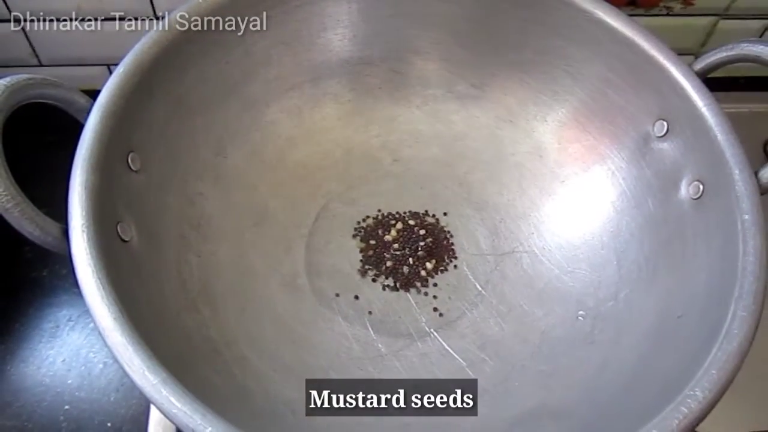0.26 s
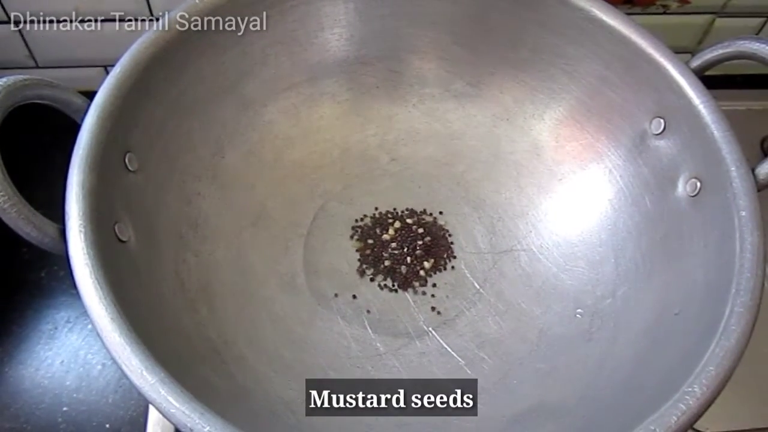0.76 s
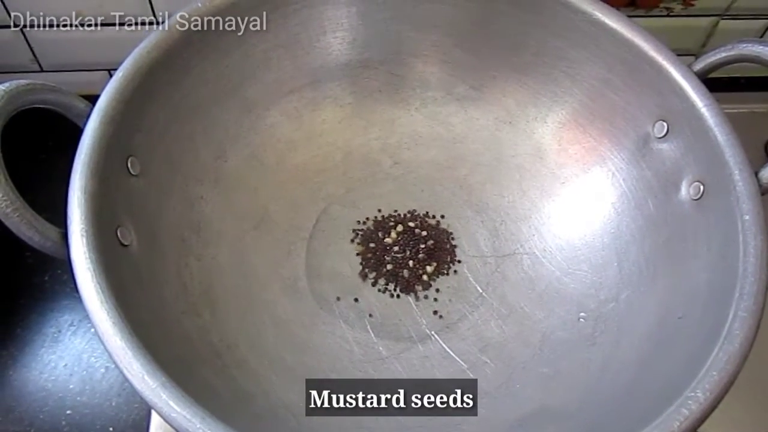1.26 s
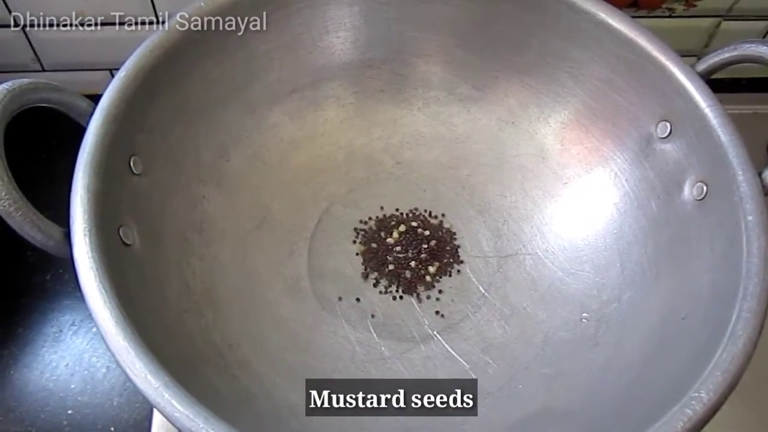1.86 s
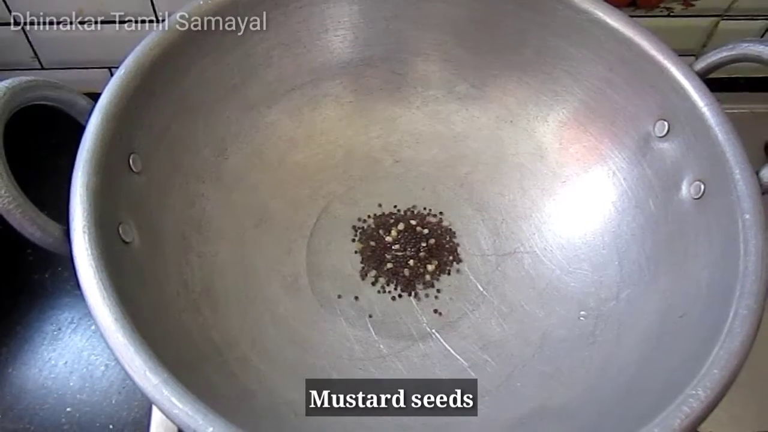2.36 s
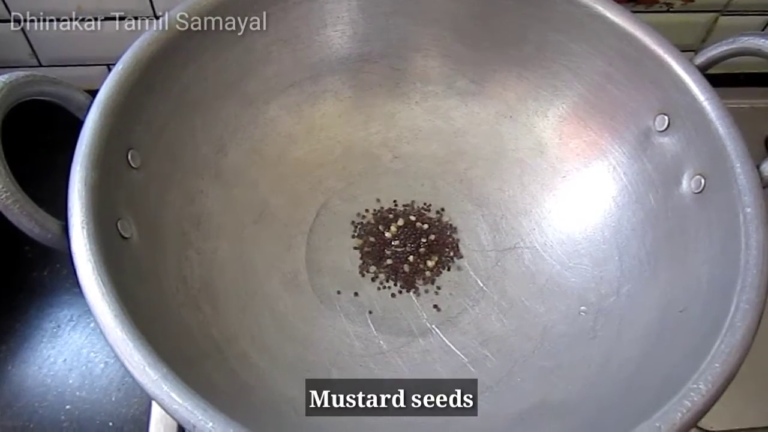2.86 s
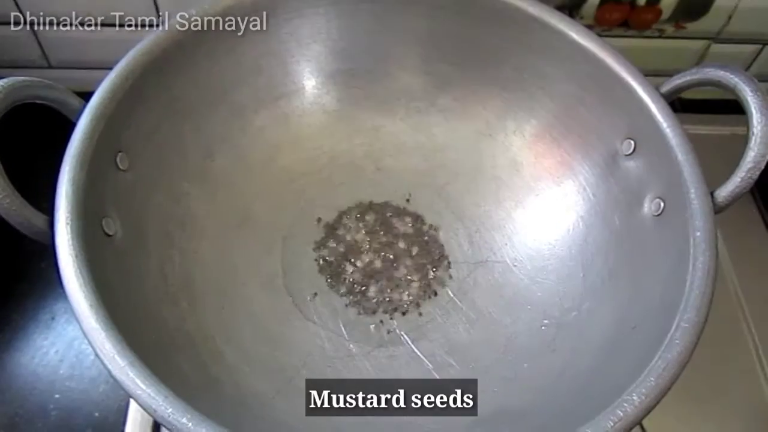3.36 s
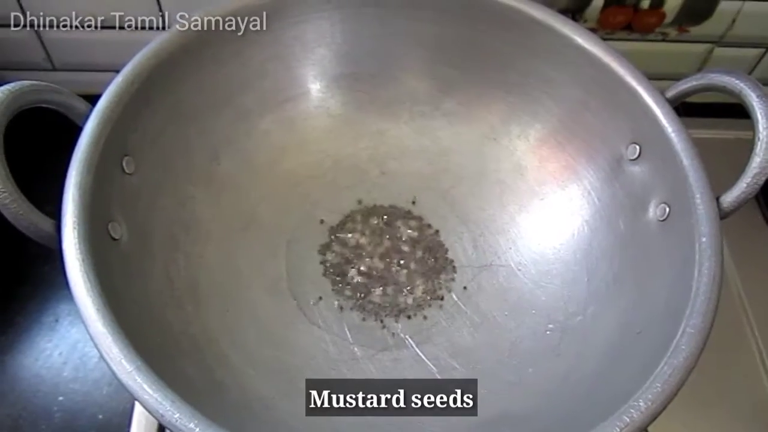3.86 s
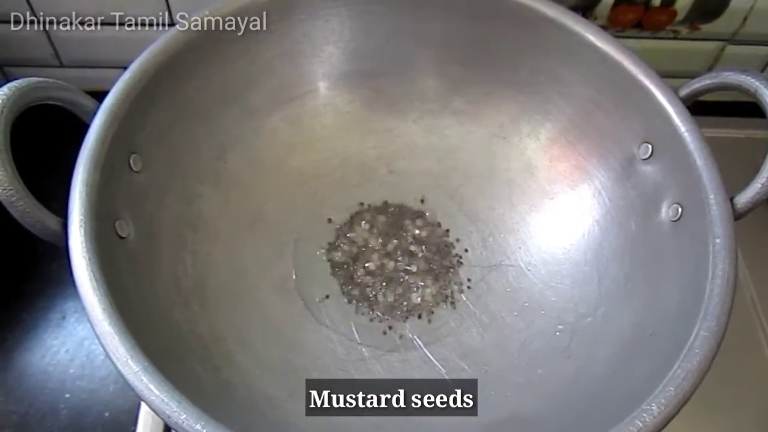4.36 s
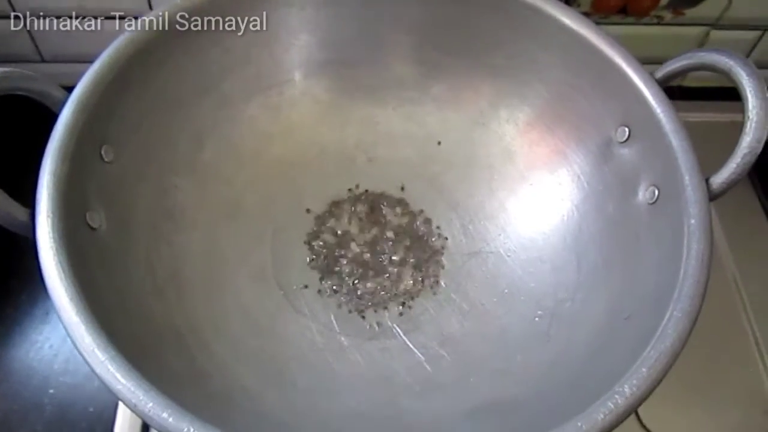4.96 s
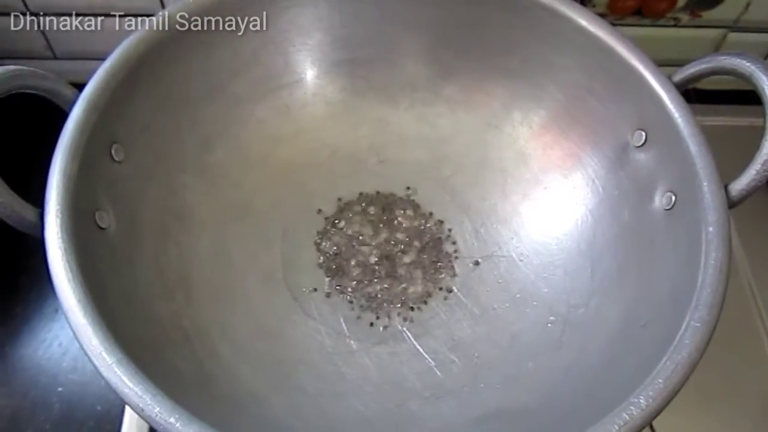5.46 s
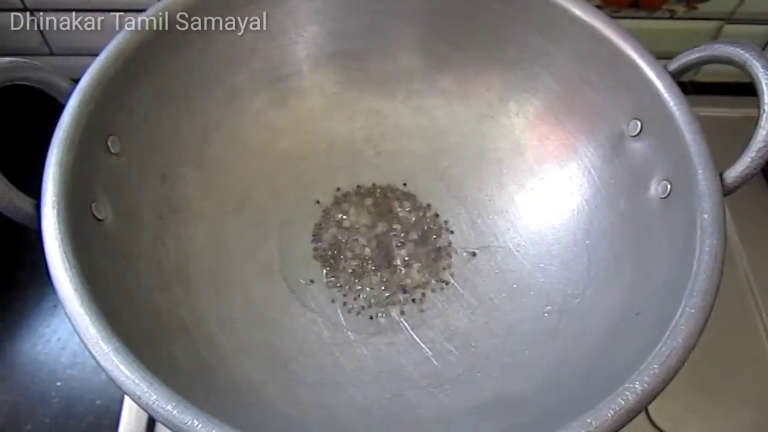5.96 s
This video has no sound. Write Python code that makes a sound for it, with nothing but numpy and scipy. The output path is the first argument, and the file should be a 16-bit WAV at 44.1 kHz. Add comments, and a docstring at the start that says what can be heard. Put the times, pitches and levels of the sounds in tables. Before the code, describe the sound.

Close stereo microphones by a pan on a kitchen stove pick up crisp, irregular seed pops over a quiet burner roar and a faint low hum. The hum stops past three seconds, then hissing oil and fine spatter rise and the bursts become faster and stronger, staying dense to the end. Faint distant knocks and short reflections from hard walls give a sense of the room.

```python
"""Seeds burst one by one in hot oil in a round metal pan; later the oil foams and they burst faster.
Each burst is two short noises, a snap and a puff of steam, ringing two small steam pockets and the pan.
A few far knocks ring over thuds; a hard kitchen answers bursts and knocks with scatter, echoes and tails.
Underneath lie coloured-noise burner roar, rumble and oil fizz, and a wavering sine hum that stops."""
import sys
import numpy as np
from scipy import signal
from scipy.fft import rfft, irfft, next_fast_len
from scipy.io import wavfile
from scipy.ndimage import map_coordinates

SR = 44100
rng = np.random.default_rng(int(sys.argv[2]) if len(sys.argv) > 2 else 0)


def transcribe(u):
    """Save the signal u as a 16-bit wav file named by the first command-line argument.

    u: samples, shape (n,) or (channels, n), limited to [-1, 1]; the rate is SR.
    q: integer samples, one column per channel.
    """
    v = np.clip(np.atleast_2d(u).T, -1, 1)
    q = np.round(v * 32767).astype(np.int16)
    wavfile.write(sys.argv[1], SR, q)


N = 273420
FOAM_S = 3.7  # the oil starts to foam

# stove levels: (time [s], burner roar [dB], oil fizz [dB])
STOVE_LEVELS = [(0, -44, -61), (1.7, -44.5, -61), (2.4, -43.5, -58), (3.35, -40, -55.5),
                (3.42, -43.5, -45.5), (3.9, -39.5, -42.5), (4.25, -41.5, -41), (4.5, -45.5, -49),
                (5.2, -41.5, -44), (5.8, -42.5, -35), (6.2, -46.5, -45)]
# likeness of left and right in roar and rumble: (frequency [Hz], likeness [0-1])
ROAR_LIKENESS = [(40, 0.083), (90, 0.15), (150, 0.055), (300, 0.59), (600, 0.83), (1500, 0.89)]
# likeness of left and right in kitchen tail and fizz: (frequency [Hz], likeness [0-1])
WALLS_LIKENESS = [(500, 0.96), (3000, 1), (6000, 0.84), (12000, 0.29)]


def amp(db):
    """Amplitude factor of a level in dB."""
    return 10 ** (np.asarray(db) / 20)


def unit(x):
    """Each row scaled to rms 1."""
    return x / np.sqrt(np.mean(x ** 2, axis=-1, keepdims=True) + 1e-20)


def along(points, hz):
    """(Hz, value) points interpolated on a log frequency axis."""
    point_hz, value = np.transpose(points)
    return np.interp(np.log(hz + 1), np.log(point_hz + 1), value)


def curves(rows):
    """One value per sample for each column after the time."""
    time_s, *columns = np.transpose(rows)
    return [np.interp(np.arange(N) / SR, time_s, column) for column in columns]


def wobble(knots_per_s):
    """A smooth random curve through normally distributed knots."""
    knots = rng.standard_normal(int(N * knots_per_s / SR) + 4)
    return map_coordinates(knots, [np.arange(N) * knots_per_s / SR])


def filtered(x, response):
    """x filtered by a complex response of frequency in Hz."""
    size = next_fast_len(x.shape[-1] + SR // 8)
    spectrum = rfft(x, size) * response(np.fft.rfftfreq(size, 1 / SR))
    return irfft(spectrum, size)[..., :x.shape[-1]]


def resonance(f, hz, width_hz):
    """One causal second-order resonance, gain 1 at its peak."""
    return 1j * f * width_hz / (hz * hz - f * f + 1j * f * width_hz)


def spread(pair, likeness):
    """Mix two unrelated signals into left and right of the given likeness."""
    def mid_side_gains(hz):
        angle = np.arccos(np.clip(along(likeness, hz), -1, 1)) / 2
        return np.array([np.cos(angle), np.sin(angle)])

    mid, side = filtered(pair, mid_side_gains)
    return np.array([mid + side, mid - side])


def placed(times_s, shapes):
    """Sum of the rows, each starting at its time."""
    at = np.round(times_s * SR).astype(int)[:, None] + np.arange(shapes.shape[1])
    return np.bincount(at.ravel(), shapes.ravel(), N + SR)[:N]


def rush(spectrum, likeness, modes=()):
    """Stereo noise of rms 1: a smooth spectrum, raised by any resonant modes."""
    def colour(f):
        ringing = 1 + sum(amp(db) * resonance(f, hz, width_hz) for hz, width_hz, db in modes)
        return amp(along(spectrum, f)) * ringing

    return unit(filtered(spread(rng.standard_normal((2, N)), likeness), colour))


def burner_roar():
    """Burner noise shaped by air resonances, its level wavering slowly."""
    # relative density: (frequency [Hz], level [dB per Hz])
    spectrum = [(25, -25), (150, -11.5), (260, -4), (371, -1.5), (532, -4.5), (716, -4), (1050, -9),
                (1900, -13.5), (4000, -29), (5200, -74)]
    # air resonances: (frequency [Hz], width [Hz], level [dB])
    air_modes = [(214.5, 14.3, 8.5), (314.4, 7.6, 5), (365, 7.7, 3)]
    level_db = curves(STOVE_LEVELS)[0] + 1.3 * wobble(6.6)
    return amp(level_db) * rush(spectrum, ROAR_LIKENESS, air_modes)


def rumble():
    """Narrow low noise of wavering level."""
    # relative density: (frequency [Hz], level [dB per Hz])
    spectrum = [(20, -50), (70, -2), (115, 9), (140, 9.5), (200, -48)]
    # (time [s], level [dB])
    levels = [(0, -60), (2.4, -57), (3.3, -50.5), (3.45, -57.5), (4.25, -49), (4.55, -56), (5.8, -55),
              (6.2, -61)]
    level_db = curves(levels)[0] + 1.8 * wobble(3.3)
    return amp(level_db) * rush(spectrum, ROAR_LIKENESS)


def hum():
    """A sine wavering in pitch and level, until it stops."""
    # (time [s], level [dB])
    levels = [(0, -54.5), (.7, -61), (2, -54.5), (3.25, -57.5), (3.4, -98)]
    level_db = curves(levels)[0] + 0.45 * wobble(3.9)
    pitch_hz = 91.4 + 0.53 * wobble(3.3)
    return np.sqrt(2) * amp(level_db) * np.sin(2 * np.pi * np.cumsum(pitch_hz) / SR)


def oil_fizz():
    """High noise made grainy by fast random level changes."""
    # relative density: (frequency [Hz], level [dB per Hz])
    spectrum = [(1760, -22), (3000, -6), (3800, -16), (4600, -4.5), (7000, 0), (10100, -11), (12700, -18),
                (14400, -29), (15500, -60)]
    grain = amp(1.1 * wobble(11) + 2.4 * wobble(310))
    return amp(curves(STOVE_LEVELS)[1]) * unit(grain * rush(spectrum, WALLS_LIKENESS))


def stove():
    """Roar, rumble, hum and fizz together."""
    return burner_roar() + rumble() + hum() + oil_fizz()


def knocks():
    """Dull knocks further off: a narrow rough ring over a broad dull thud."""
    # (time [s], level [dB], pitch [Hz], ring t60 [s])
    table = [(0.641, -34, 1610, 0.28), (0.916, -31.5, 1670, 0.27), (.962, -26, 1795, 0.31),
             (4.567, -40, 1400, 0.79), (4.621, -35, 1330, 0.33)]
    time_s, level_db, hz, t60_s = (column[:, None] for column in np.transpose(table))
    t = np.arange(SR // 4) / SR
    noise = rng.standard_normal((len(time_s), len(t)))
    thud = unit(filtered(noise, lambda f: resonance(f, 1340, 1100) ** 2))
    thud *= amp(7 - 60 * t / 0.02)
    ring = unit(filtered(
        noise, lambda f: resonance(f, hz, 170) + amp(-26) * resonance(f, 1.44 * hz, 470)))
    ring *= amp(-60 * t / t60_s)
    onset = 1 - np.exp(-t / 0.0012)
    return placed(time_s[:, 0], amp(level_db) * onset * (ring + thud))


def bursts(table):
    """A snap thumps and rings the low pocket; a ragged puff of steam rings the high one."""
    # the harder the snap against the puff, the broader: (low minus high [dB], width before foam [Hz])
    high_widths = [(-24.5, 830), (-13.5, 2050)]
    foam_widening = 1.41  # foam damps the high pocket further
    time_s, low_db, high_hz, high_db = (column[:, None] for column in np.transpose(table))
    low_hz = 2946 * np.exp(0.061 * rng.standard_normal((len(time_s), 1)))  # scatter from seed to seed
    width_hz = np.interp(low_db - high_db, *np.transpose(high_widths))
    width_hz = width_hz * np.where(time_s > FOAM_S, foam_widening, 1)

    t = np.arange(1024) / SR
    snap, puff = rng.standard_normal((2, len(time_s), len(t)))
    snap *= amp(-60 * t / 0.008)
    puff *= amp(-60 * t / 0.011)
    snap[:, 4:12] += 2.5 * np.hanning(8)
    puff[:, 6] += 3

    def low_response(f):
        thump = resonance(f, 1244, 4200) ** 2
        return thump * (1 + amp(11) * resonance(f, low_hz, 560))

    def high_response(f):
        pocket = resonance(f, high_hz, 1.45 * width_hz) ** 2  # squaring narrows it again
        return pocket + amp(-22) * resonance(f, 6500, 2700)

    low = amp(low_db) * unit(filtered(snap, low_response))
    high = amp(high_db) * unit(filtered(puff, high_response))
    # nearly all the energy lies in the first quarter, 6 ms, whose rms the table gives
    return placed(time_s[:, 0], (low + high) / 2)


def spatter(count):
    """Table of small random bursts once the oil foams, more and more of them."""
    u = rng.random((count, 4))
    time_s = FOAM_S + (N / SR - FOAM_S) * u[:, 0] ** .8
    high_db = -44 - 4 * np.log(u[:, 3] + 0.069)
    low_db = high_db - 14 * u[:, 1]
    high_hz = 4800 + 3500 * u[:, 2]
    return np.transpose([time_s, low_db, high_hz, high_db])


def seeds():
    """Bursts as heard out of the pan, whose modes they ring."""
    # single bursts: (time [s], low pocket [dB], high pocket pitch [Hz], high pocket [dB])
    pops = [(0.0501, -41.5, 5400, -29.5), (0.1025, -40, 5740, -32), (0.123, -36, 4900, -33.5),
            (0.2952, -17.5, 7400, -25.5), (0.398, -54, 9000, -40), (0.4556, -49, 7500, -28),
            (0.5365, -60, 7140, -20), (0.5955, -26, 6600, -31), (0.6187, -40, 7620, -17.5),
            (0.7238, -20.5, 7400, -23), (0.8088, -60, 7500, -19.5), (0.9637, -45, 9500, -33.5),
            (1.0045, -29, 6000, -19.5), (1.0421, -46, 5230, -16.5), (1.0943, -18, 6510, -22),
            (1.1065, -42, 6300, -26), (1.142, -33, 6900, -30.5), (1.2622, -23.5, 7100, -23),
            (1.3193, -36, 6760, -24), (1.4027, -18.5, 7300, -23.5), (1.4637, -27, 7300, -18.5),
            (1.5056, -41, 7160, -15), (1.5502, -57, 8500, -31), (1.5928, -23.5, 7400, -16.5),
            (1.6385, -57, 7720, -35), (1.6493, -59, 7270, -13.5), (1.7274, -31.5, 4950, -18.5),
            (1.7706, -40, 6130, -23.5), (1.7815, -37, 4950, -22), (1.9299, -36, 4600, -28),
            (1.997, -38.5, 6340, -28.5), (2.0105, -53, 6840, -22), (2.045, -41.5, 6270, -16.5),
            (2.1137, -30.5, 5460, -11.5), (2.1483, -19, 7450, -24.5), (2.2476, -45, 6860, -21),
            (2.4028, -38, 4630, -34), (2.5672, -58, 7280, -15), (2.6576, -22.5, 6200, -21),
            (2.7102, -42, 8200, -31.5), (2.9654, -24.5, 6500, -17), (3.062, -37, 6760, -17),
            (3.3595, -55, 9600, -24.5), (3.3988, -32.5, 6600, -22.5), (3.4164, -25, 4540, -17),
            (3.5961, -34.5, 6300, -38), (3.6575, -21, 6900, -25), (3.7285, -18, 5200, -13.5),
            (3.9092, -20, 4740, -9.5), (3.9157, -24, 7760, -12.5), (3.9574, -31, 5300, -23),
            (3.9967, -15.5, 5140, -17.5), (4.0199, -18, 6800, -24), (4.0364, -24.5, 5700, -6.5),
            (4.0903, -22, 5790, -25), (4.1526, -24, 5800, -13.5), (4.1639, -18, 6950, -9),
            (4.2425, -14.5, 5160, -8), (4.2527, -48, 6060, -19), (4.2939, -23, 6500, -17.5),
            (4.349, -32, 5440, -32), (4.4808, -35, 6400, -26.5), (4.5408, -26, 4370, -11.5),
            (4.6184, -31, 5640, -25.5), (4.6895, -35.5, 7200, -16.5), (4.7652, -20.5, 5550, -18),
            (4.8324, -27.5, 5000, -21), (4.8637, -31.5, 5900, -20.5), (4.887, -28, 6000, -23),
            (4.891, -17, 5390, -36), (4.9315, -28.5, 7600, -17.5), (4.9944, -27, 5990, -51),
            (5.016, -33.5, 4680, -29.5), (5.062, -50, 7000, -31), (5.1422, -19.5, 5930, -12.5),
            (5.2519, -16.5, 5100, -14), (5.2638, -25, 9000, -13), (5.2704, -19, 6100, -10.5),
            (5.336, -25.5, 6900, -14), (5.3491, -27, 6650, -13), (5.3813, -42, 4800, -22.5),
            (5.3904, -29, 4560, -22), (5.4832, -19, 4950, -16), (5.5405, -54, 5670, -21),
            (5.5483, -21, 6500, -12), (5.5812, -25.5, 5330, -29), (5.6256, -24, 6300, -13.5),
            (5.6806, -54, 5140, -25), (5.6969, -19, 6100, -9), (5.7281, -25, 5360, -21),
            (5.7383, -33, 5660, -14.5), (5.778, -26, 6840, -14.5), (5.7873, -16.5, 6500, -15.5),
            (5.8387, -12.5, 5370, -7.5), (5.8488, -55, 7850, -12), (5.9001, -36, 5490, -23),
            (5.9207, -32, 4340, -18), (5.9473, -24.5, 5400, -13.5), (6.0343, -25, 8100, -12),
            (6.0805, -24, 5030, -16), (6.0971, -30.5, 5900, -19.5), (6.1507, -28.5, 5900, -18)]
    # pan modes: (frequency [Hz], width [Hz], level over the direct sound [dB])
    modes = [(1967, 110, 5.5), (2610, 38, -14.5), (3422, 67, -7.5), (5000, 210, -8.5), (6510, 62, -24)]
    dry_bursts = bursts(pops) + bursts(spatter(count=380))
    return filtered(
        dry_bursts, lambda f: 1 + sum(amp(db) * resonance(f, hz, width_hz) for hz, width_hz, db in modes))


def kitchen(x, bowl_db, walls_db, parts):
    """Direct path, scatter in the bowl, two echoes and walls; 34 ms stretches take the responses in turn."""
    # wall decay: (frequency [Hz], t60 [s])
    decay = [(1000, 0.47), (6000, 0.29), (12000, 0.32)]
    # near flat surfaces: (delay [s], level [dB], strongest frequency [Hz])
    echoes = [(.01, -15.5, 6600), (0.0148, -44, 1920)]
    out = np.zeros((2, N))
    t = np.arange(SR // 2) / SR
    which = np.arange(N) // 1500 % parts
    for k in range(parts):
        hz, frame_s, z = signal.stft(rng.standard_normal((2, len(t))), SR, nperseg=256)
        z = z * amp(-60 * frame_s / along(decay, hz)[:, None])
        walls = signal.istft(z, SR, nperseg=256)[1][:, :len(t)]
        walls = amp(walls_db) * unit(walls) * (1 - np.exp(-(t / 0.017) ** 2))
        bowl = amp(bowl_db) * unit(rng.standard_normal((2, len(t))) * amp(-60 * t / 0.058))

        # the treble beams out of the bowl and reaches the walls more strongly
        tail = filtered(spread(walls + bowl, WALLS_LIKENESS),
                        lambda f: amp(along([(3000, -2.46), (5000, 1)], f)))
        tail = tail / np.sqrt(len(t))
        for delay_s, db, echo_hz in echoes:
            click = amp(db + rng.normal(0, 2.5, (2, 1))) * (np.arange(len(t)) == round(delay_s * SR))
            tail = tail + filtered(click, lambda f: resonance(f, echo_hz, 2.4 * echo_hz))

        # seeds lie left or right of centre: one microphone hears them a few microseconds sooner
        lag_samples = 0.15 * (-1) ** k * np.array([[1], [-1]])
        tail[:, :17] += np.sinc(np.arange(-8, 9) - lag_samples) * np.hanning(19)[1:-1]
        out += signal.fftconvolve((x * (which == k))[None], tail, axes=1)[:, :N]
    return out


def scene():
    """The pan in its kitchen, coloured on the way to the two microphones, over the stove."""
    # colour of pan and knocks: (frequency [Hz], gain [dB])
    pan_colour = [(200, -3), (800, -3.5), (3400, -2), (4000, -7), (4700, -4), (9000, -5), (12000, -6.5),
                  (14500, -16.5), (16000, -47)]
    # channel balance: (frequency [Hz], left over right [dB])
    balance = [(200, 1.6), (1800, 0), (8000, 1), (15000, 0.5)]
    pan = kitchen(seeds() + knocks(), bowl_db=-2.5, walls_db=-6.5, parts=8)
    both = filtered(pan, lambda hz: amp(along(pan_colour, hz))) + stove()
    return filtered(both, lambda hz: amp(along(balance, hz) * np.array([[.5], [-.5]])))


def record(dry):
    """A soft ceiling rounds the loudest bursts; then nothing stays above the band limit."""
    ceiling, top_hz = 1.05, 16400
    capped = dry / (1 + np.abs(dry / ceiling) ** 8) ** (1 / 8)
    return filtered(capped, lambda hz: hz < top_hz)


dry = scene()
out = record(dry)
transcribe(out)
```